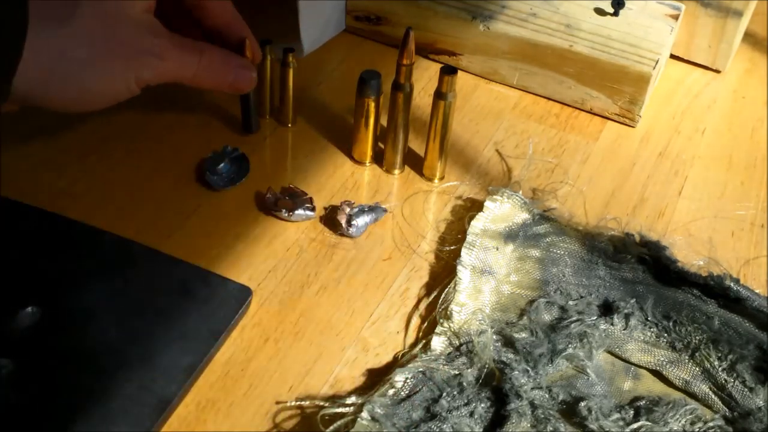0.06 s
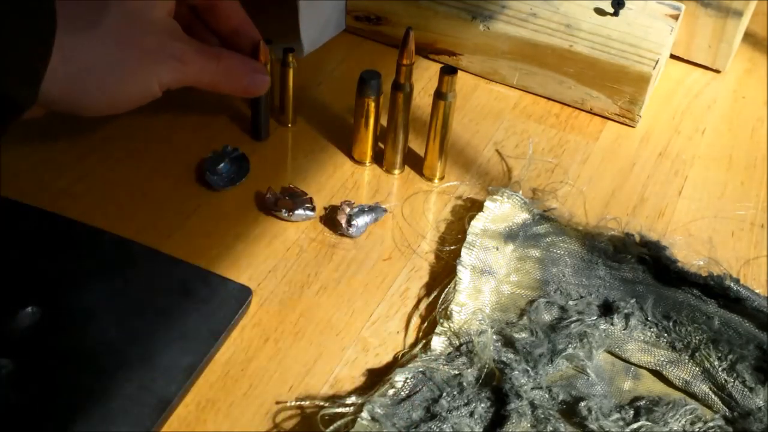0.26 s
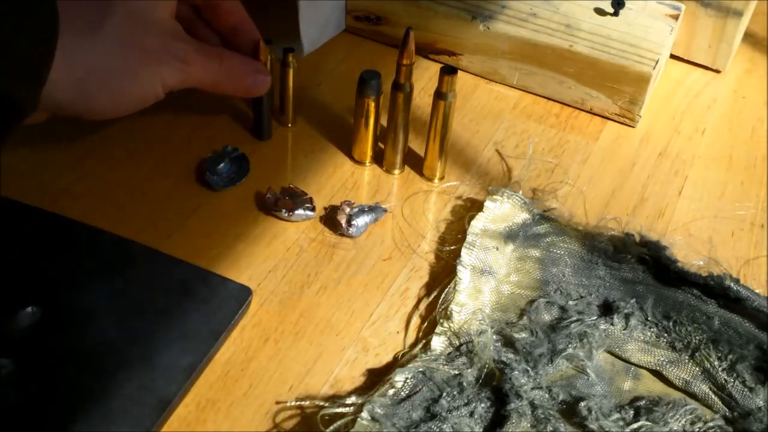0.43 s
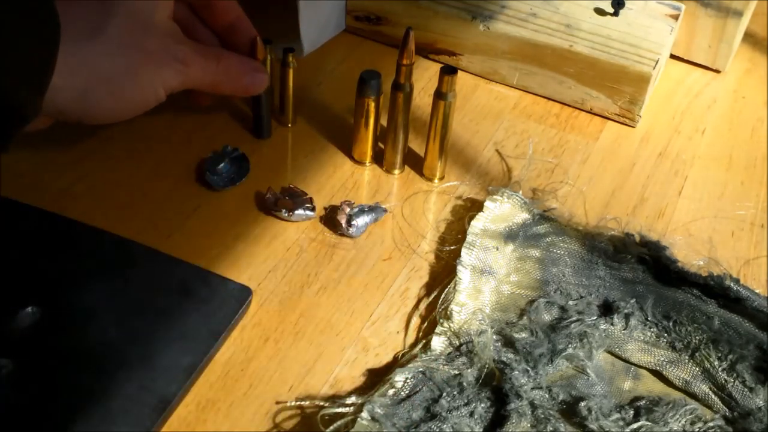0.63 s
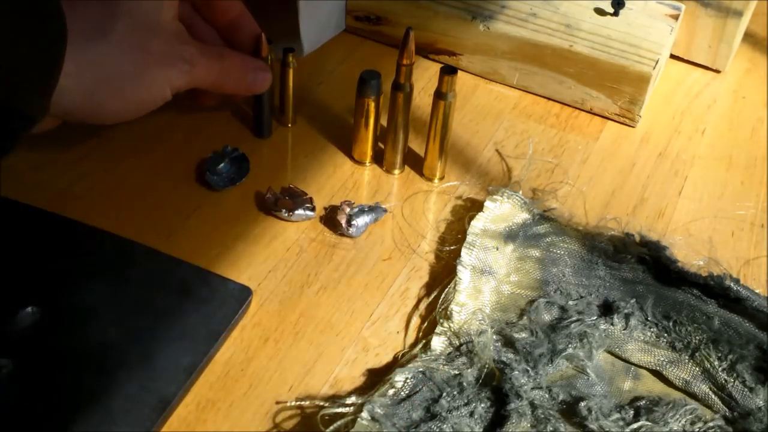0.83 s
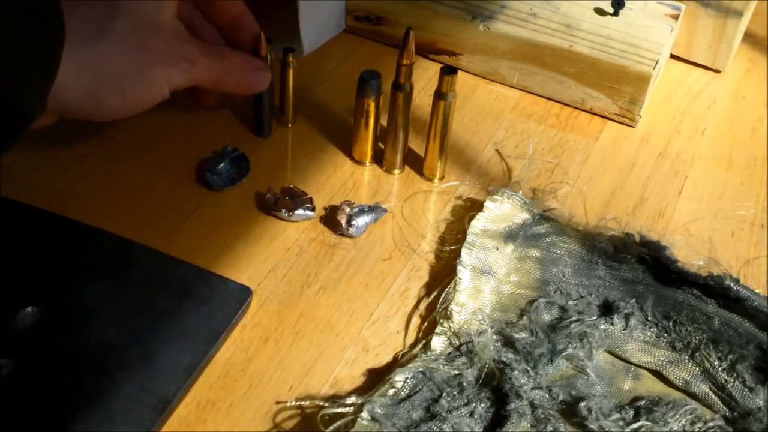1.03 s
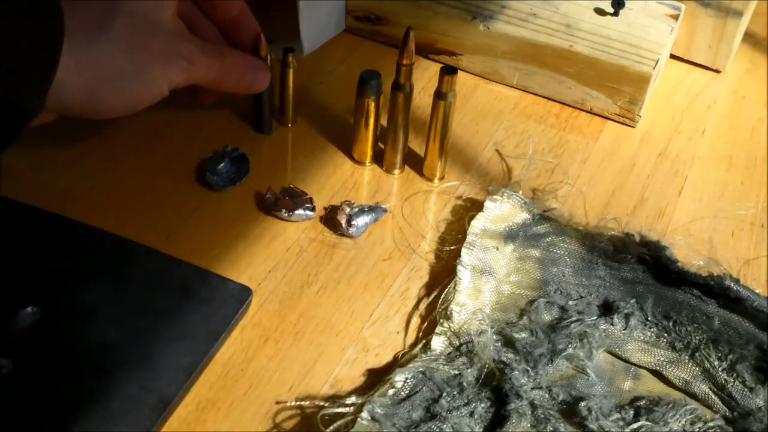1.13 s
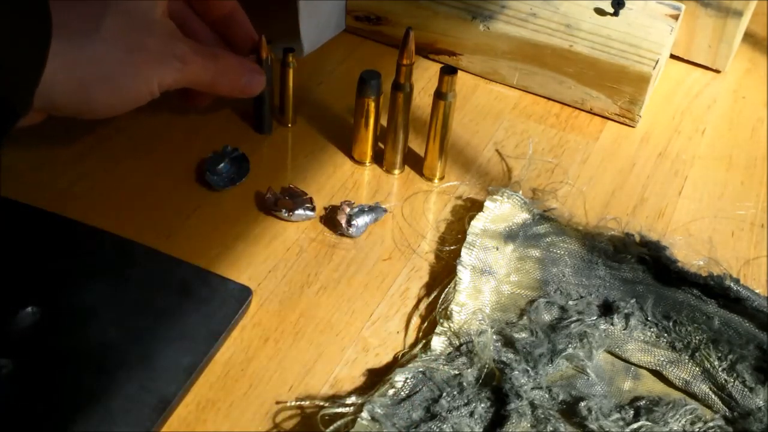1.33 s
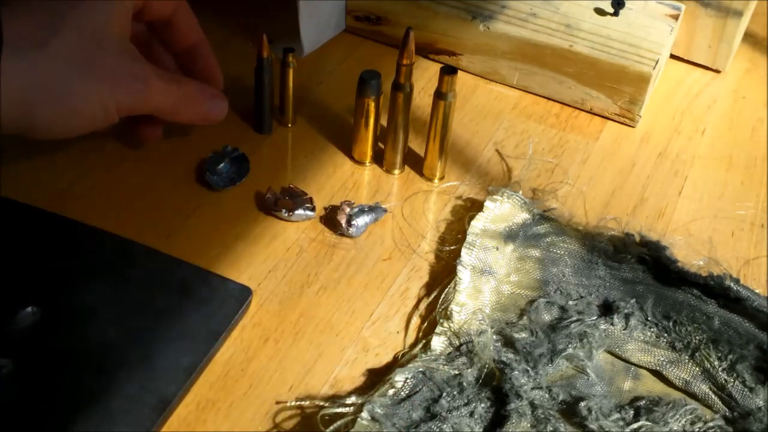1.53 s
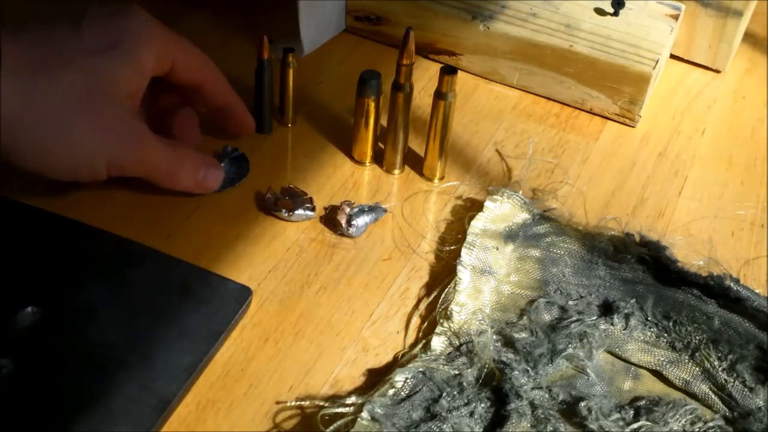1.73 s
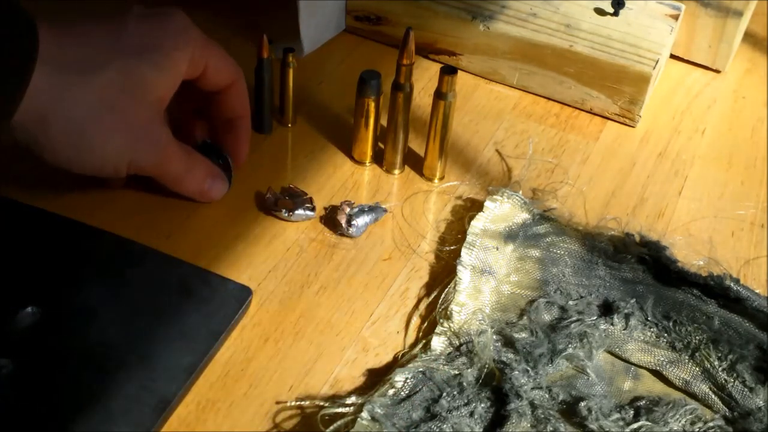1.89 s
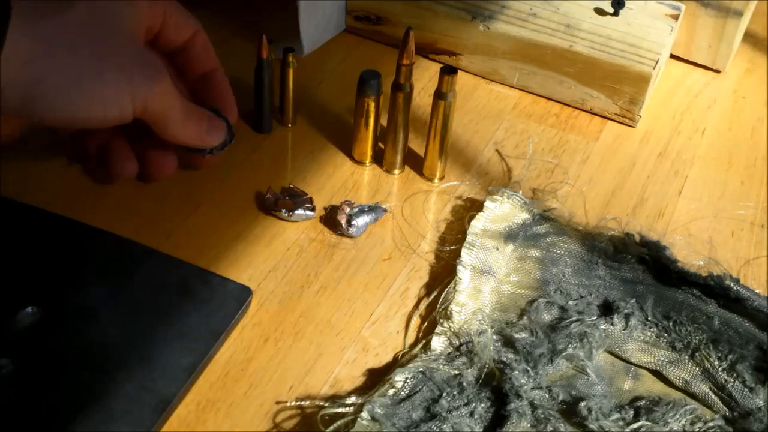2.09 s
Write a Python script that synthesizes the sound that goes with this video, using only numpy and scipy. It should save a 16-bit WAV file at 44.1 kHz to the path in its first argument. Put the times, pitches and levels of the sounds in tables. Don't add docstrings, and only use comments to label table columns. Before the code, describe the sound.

Small metal cartridge cases tap a wooden tabletop, with sharp clinks, faint squeaks and light scrapes

```python
import sys
import numpy as np
from scipy import signal
from scipy.fft import rfft, irfft
from scipy.io import wavfile
from scipy.ndimage import uniform_filter1d

SR = 44100
rng = np.random.default_rng(int(sys.argv[2]) if len(sys.argv) > 2 else 0)


def output_pcm(signal):
    pcm = np.clip(np.atleast_2d(signal).T, -1, 1) * 32767
    wavfile.write(sys.argv[1], SR, np.round(pcm).astype(np.int16))


def how_loud(loudness_db):
    steps = np.asarray(loudness_db, float) / 20
    return 10 ** steps


N = 94903

# hz [Hz], density_db [dB per Hz]
HISS = [(20, -5), (50, -6), (93, -7), (183, -0.5), (582, -8.5), (2500, -15.5), (7500, -20), (15500, -24)]
# hz [Hz], rms_db [dB], width_hz [Hz]
RUMBLE = [(114.7, -60.5, 8.3), (174.4, -56.5, 8.5), (257.2, -59, 51), (8550, -68.5, 170)]
# hz [Hz], t60_s [s]
ROOM_DECAY = [(300, 0.62), (1000, 0.35), (3000, 0.47), (6000, 0.38), (10000, 0.28), (15000, 0.21)]
# delay_s [s, after the first], level_db [dB]
SLAP_CLUSTER = [(0, 0), (.0013, -3), (.0029, -4), (.0078, -5)]
# delay_s [s], level_db [dB]
TABLE_REFLECTIONS = [(.0011, -4), (.0021, -2), (.0037, -8)]

# start_s [s], pitch_hz [Hz], level_db [dB]
SQUEAK_LOW = [(.70, 5180, -54), (0.707, 5200, -51), (0.717, 5300, -54), (.725, 6000, -53),
              (.733, 5950, -53), (0.746, 5290, -41), (0.773, 5490, -50.5), (.78, 5440, -69),
              (.79, 5450, -69)]
# start_s [s], pitch_hz [Hz], level_db [dB]
SQUEAK_HIGH = [(.73, 5950, -43), (.74, 6020, -49), (.75, 5950, -42.5), (0.767, 5750, -56),
               (.775, 5680, -67.5)]
# start_s [s], pitch_hz [Hz], level_db [dB]
SQUEAK_LATE = [(1.068, 6000, -65), (1.075, 6000, -50.5), (1.086, 6000, -55), (1.092, 6000, -66)]
OCTAVES_DB = [1, -21, -18]

# start_s [s], level_db [dB], pitch_hz [Hz]
TICKS = [
    (.316, -46, 5500),
    (.715, -54, 9500),
    (1.7245, -50, 9700),
]
# start_s [s], length_s [s], level_db [dB], tilt_db [dB per octave]
RUBS = [
    (0.311, 0.021, -42.5, -4),
    (0.371, 0.15, -39, -1.5),
]
# hz [Hz], level_db [dB], t60_s [s]
RUBBED_CASE = [(780, -26, 0.022), (1694, -18, .02), (2600, -12, 0.026), (3020, -3.5, 0.022),
               (5440, -2, 0.0073), (6600, 0, 0.0032), (9760, -1.5, .005)]
# start_s [s], length_s [s], level_db [dB], tilt_db [dB per octave]
DRAGS = [
    (.955, 0.058, -50, -1.5),
    (.99, 0.078, -53.5, -2.5),
]
# hz [Hz], level_db [dB], t60_s [s]
DRAGGED_CASE = [(820, -8.5, 0.037), (1720, -3, 0.014), (2020, -9, 0.013), (2570, 0, 0.013),
                (2870, 0.5, 0.019)]

# start_s [s], level_db [dB], contact_s [s], tilt_db [dB per octave]
NUDGES = [
    (.998, -43, .012, -14),
    (1.49, -43.5, .012, -3.5),
    (1.62, -40.5, .015, -10),
    (1.847, -34, .014, -3),
    (2.003, -26.5, .009, 2),
    (2.016, -27.5, 0.0041, 2.5),
    (2.045, -33.5, 0.024, 7),
]
# hz [Hz], level_db [dB], t60_s [s]
LUMP_TABLE = [(402, -5, 0.043), (579, -5, 0.041), (679, -6, 0.061), (909, -14.5, 0.081),
              (1136, -1.5, 0.019), (1295, -16, 0.013), (1780, -10, 0.011), (3000, -25, 0.017)]

# start_s [s], level_db [dB], scuff_s [s, before contact], scuff_db [dB]
CLINKS = [
    (0.4243, -18.5, .008, -9),
    (.826, -33.5, .008, -9),
    (1.558, -33, .004, -9),
]
# hz [Hz], level_db [dB], t60_s [s]
PAIR_A = [(1297, -13.5, 0.039), (1890, -8.5, 0.007), (2130, -21, 0.0043), (2968, 3, 0.012), (3960, 4, .004),
          (4680, -6.5, 0.0063), (6000, 2, 0.0065), (6500, -0.5, 0.0063), (7150, -3.5, 0.014),
          (7720, 5, 0.0074), (9200, -3.5, 0.0042), (10450, 6.5, 0.0057), (11250, -2, 0.0069),
          (13700, -7.5, 0.0022)]
# hz [Hz], level_db [dB], t60_s [s]
PAIR_B = [(1320, -11, 0.013), (2250, -11, 0.014), (2495, -4.5, 0.012), (2970, -8, 0.01), (3900, 1, 0.0026),
          (4900, 0.5, 0.0038), (6000, -6, 0.011), (6870, -1, 0.0091), (7900, 0.5, 0.0094),
          (9730, 3, 0.0059), (10220, 1, .006), (11000, 2.5, 0.0041), (13800, -14, .006)]
# hz [Hz], level_db [dB], t60_s [s]
PAIR_C = [(1310, -14.5, 0.0085), (2274, -5.5, 0.0086), (2520, -9, 0.022), (3030, -7, 0.0062),
          (4520, 0, 0.005), (5600, -9, 0.0051), (7050, -5.5, 0.011), (7880, -2, 0.0052), (9520, -1, 0.0078),
          (10660, -2, 0.0047), (11600, -14, 0.0037)]

# start_s [s], level_db [dB], tilt_db [dB per octave]
KNOCKS = [
    (0.2455, -13.5, 0),
    (1.2422, -27.5, -3.5),
    (1.343, -60, -26),
    (1.751, -37, -4.5),
]
# delay_s [s], level_db [dB]
ROCKING = [(0, -1), (.0029, 0.5), (.0042, 5.5), (.0072, -5), (0.0117, -4.5), (0.0181, -5)]
# hz [Hz], level_db [dB], t60_s [s]
TABLE_TOP = [(271.4, -13.5, 0.092), (363.5, 2, 0.11), (414, -3, 0.069), (572, -25, 0.035), (694, 1, 0.028),
             (866.7, 1, 0.15), (1176, 11, 0.03), (1429, 11.5, 0.013), (1815, 10, 0.054), (2184, 8.5, 0.019),
             (2663, 3.5, 0.023), (3510, 6, 0.0097), (4200, -2.5, 0.023), (7300, -12, 0.0072)]
# hz [Hz], level_db [dB], t60_s [s]
EDGE_TICK = [(5200, -9, 0.0013), (9400, -17, 0.0017)]


def evened(x):
    return x / np.sqrt(np.mean(x ** 2) + 1e-20)


def read(points, hz):
    f, value = np.transpose(points)
    return np.interp(np.log(hz + 1), np.log(f + 1), value)


def add(mix, start_s, sound):
    part = mix[round(start_s * SR):][:len(sound)]
    part += sound[:len(part)]


def drift(shape, width):
    noise = rng.standard_normal(shape)
    return evened(uniform_filter1d(uniform_filter1d(noise, width), width))


def ring(modes, tilt_db=0):
    contact_s = 0.00025
    t = np.arange(6000) / SR
    hz, level_db, t60_s = np.transpose(modes)[:, :, None]
    phase = np.pi * np.arange(len(modes))[:, None] ** 2 * 0.618
    decay = how_loud(level_db + tilt_db * np.log2(hz / 1000) - 60 * t / t60_s)
    out = (decay * np.sin(2 * np.pi * hz * t + phase)).sum(0)
    out = out * (1 - np.exp(-t / contact_s))
    return out / np.sqrt(np.sum(out ** 2) / 220)


def grit(length_s, per_s, spread_db):
    chance, side, size = rng.random((round(length_s * SR), 3)).T
    hits = (chance < per_s / SR) * np.sign(side - 0.5)
    hits = hits * how_loud(-spread_db * np.log(size + 0.0015)) + 1e-9
    return hits / np.linalg.norm(hits)


def room(x, wet_db, slap_db):
    slap_s, build_s, lumpy_db = 0.017, 0.013, 1.6
    taps = np.zeros(SR)
    at = np.arange(100, SR - 12, 12)
    taps[at + rng.integers(0, 12, len(at))] = rng.choice([-1., 1.], len(at))
    hz, t, z = signal.stft(taps, SR, nperseg=256)
    z = z * how_loud(-60 * t / read(ROOM_DECAY, hz)[:, None])
    tail = signal.istft(z, SR, nperseg=256)[1][:SR]
    build = 1 - np.exp(-np.arange(SR) / SR / build_s)
    tail = tail * build * how_loud(lumpy_db * drift(SR, 130))
    response = how_loud(wet_db) * tail / np.linalg.norm(tail)
    response[0] = 1
    for delay_s, level_db in SLAP_CLUSTER:
        response[round((slap_s + delay_s) * SR)] += how_loud(slap_db + level_db)
    return signal.fftconvolve(x, response)[:N]


def microphone_hiss():
    hz = np.fft.rfftfreq(N, 1 / SR)
    spectrum = rfft(rng.standard_normal(N)) * how_loud(read(HISS, hz))
    return how_loud(-48) * evened(irfft(spectrum, N))


def appliance_rumble():
    out, hz = np.zeros(N), np.fft.rfftfreq(N, 1 / SR)
    for centre_hz, level_db, width_hz in RUMBLE:
        resonance = 1 / (1 + (2 * (hz - centre_hz) / width_hz) ** 2)
        out += how_loud(level_db) * evened(irfft(rfft(rng.standard_normal(N)) * resonance, N))
    return out


def mains_hum():
    mains_hz, rms_db = 50.7, -55.5
    return how_loud(rms_db) * np.sqrt(2) * np.sin(2 * np.pi * mains_hz * np.arange(N) / SR)


def finger_ticks():
    out = np.zeros(N)
    for start_s, level_db, hz in TICKS:
        add(out, start_s, how_loud(level_db) * ring([(hz, 0, 0.006), (hz * 0.75, -8, 0.005)]))
    return out


def slide(out, rows, modes):
    for start_s, length_s, level_db, tilt_db in rows:
        hits = grit(length_s, 4000, 1.5)
        hits = hits * np.hanning(len(hits)) ** 0.3
        sound = signal.fftconvolve(hits, ring(modes, tilt_db))
        add(out, start_s, how_loud(level_db) * np.sqrt(length_s / 0.0037) * sound)


def rubs_and_drags():
    out = np.zeros(N)
    slide(out, RUBS, RUBBED_CASE)
    slide(out, DRAGS, DRAGGED_CASE)
    return room(out, -0.47, -7)


def squeaks():
    out, t = np.zeros(N), np.arange(N) / SR
    for curve, octave_db in zip((SQUEAK_LOW, SQUEAK_HIGH, SQUEAK_LATE), OCTAVES_DB):
        at_s, pitch_hz, level_db = np.transpose(curve)
        pitch_wobble, level_wobble = drift((2, N), 90)
        hz = np.interp(t, at_s, pitch_hz) * (1 + 0.0114 * pitch_wobble)
        phase = 2 * np.pi * np.cumsum(hz) / SR
        level = how_loud(np.interp(t, at_s, level_db, -140, -140) + 2.2 * level_wobble)
        out += level * np.sqrt(2) * (np.sin(phase) + how_loud(octave_db) * np.sin(2 * phase))
    return room(out, -5, -8.5)


def lump_nudges():
    out = np.zeros(N)
    for start_s, level_db, contact_s, tilt_db in NUDGES:
        sound = signal.fftconvolve(grit(contact_s, 3000, 1.5), ring(LUMP_TABLE, tilt_db))
        add(out, start_s, how_loud(level_db) * sound)
    return room(out, -9, -20)


def clinks():
    out, near = np.zeros(N), np.zeros(400)
    for delay_s, level_db in TABLE_REFLECTIONS:
        near[round(delay_s * SR)] = how_loud(level_db)
    for (start_s, level_db, scuff_s, scuff_db), modes in zip(CLINKS, (PAIR_A, PAIR_B, PAIR_C)):
        clink = np.zeros(N)
        scuff = signal.fftconvolve(grit(scuff_s, 6000, 2), ring(modes, -6))
        add(clink, start_s - scuff_s, how_loud(level_db + scuff_db) * scuff)
        add(clink, start_s, how_loud(level_db) * ring(modes))
        out += room(clink, 6, -2) + signal.fftconvolve(clink, near)[:N]
    return out


def knocks():
    out, hits = np.zeros(N), np.zeros(1200)
    for delay_s, rock_db in ROCKING:
        hits[round(delay_s * SR)] = how_loud(rock_db)
    for start_s, level_db, tilt_db in KNOCKS:
        knock = signal.fftconvolve(hits, ring(TABLE_TOP, tilt_db))
        add(out, start_s, how_loud(level_db - 2.5) * knock)
        add(out, start_s, how_loud(level_db - 29.5 + 3.7 * tilt_db) * ring(EDGE_TICK))
    return room(out, -9, -20)


def scene():
    background = microphone_hiss() + appliance_rumble() + mains_hum()
    handling = finger_ticks() + rubs_and_drags() + squeaks() + lump_nudges()
    return (background + handling + clinks() + knocks())[None]


def roll_off(x):
    return signal.sosfilt(signal.butter(12, 16000, fs=SR, output="sos"), x)


def record(dry):
    lowpass = signal.firwin(511, 15950, window=("kaiser", 9), fs=SR)
    mix = signal.oaconvolve(dry, lowpass[None], "same")
    return roll_off(mix)


dry = scene()
out = record(dry)
output_pcm(out)
```